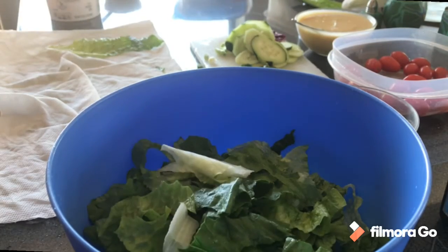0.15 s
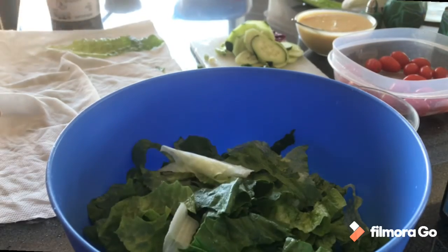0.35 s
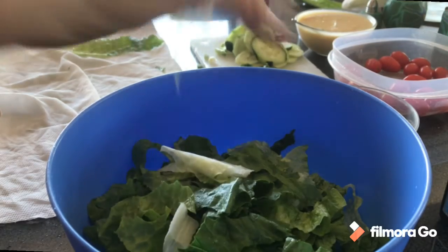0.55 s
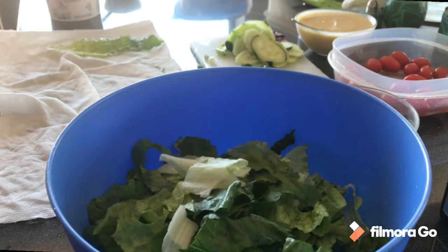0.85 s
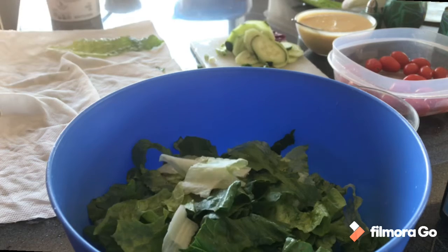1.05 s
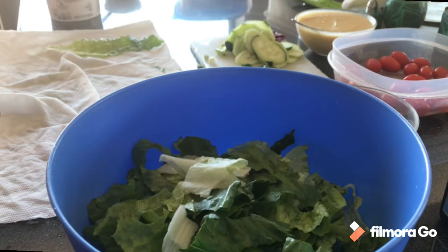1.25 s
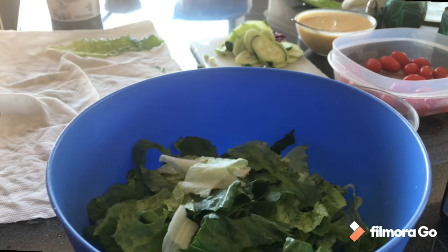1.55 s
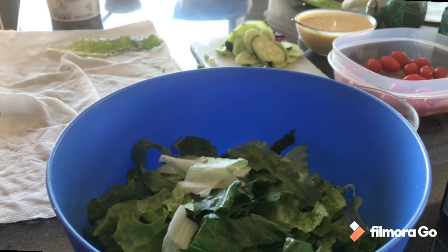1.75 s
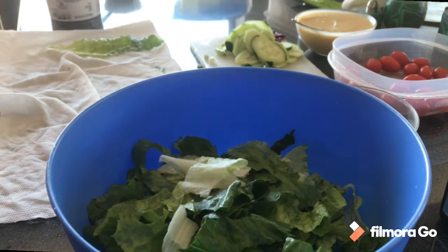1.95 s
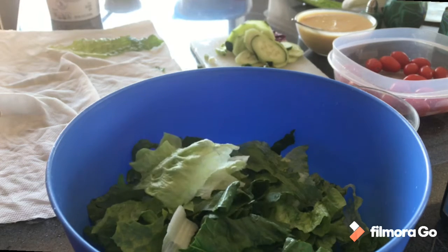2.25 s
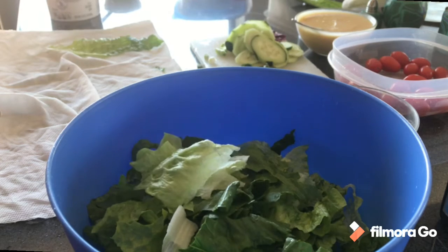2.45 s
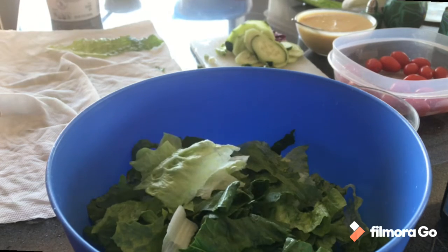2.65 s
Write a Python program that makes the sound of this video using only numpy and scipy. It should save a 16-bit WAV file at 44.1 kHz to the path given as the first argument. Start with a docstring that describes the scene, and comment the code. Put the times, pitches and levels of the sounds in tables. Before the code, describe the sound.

Crisp lettuce is torn by hand close to a small microphone, snapping and crackling in three short bursts. After each of the first two, a piece drops lightly into a plastic bowl. A kitchen appliance hums faintly behind.

```python
"""Crisp lettuce snaps and crackles as hands tear it over a plastic bowl, close to a small microphone.
Ribs break in short clusters of tiny cracks; between them the leaf crackles and slides on itself.
Two torn pieces drop into the bowl, each landing in several light touches.
The kitchen answers with a short tail over steady air noise and a low appliance hum."""
import sys
import numpy as np
from scipy import signal
from scipy.io import wavfile

SR = 44100
rng = np.random.default_rng(int(sys.argv[2]) if len(sys.argv) > 2 else 0)


def master_out(mix):
    """Clip the mix to full scale and print it as 16-bit PCM to the path in sys.argv[1]."""
    frames = np.transpose(np.atleast_2d(mix))
    ceiling = np.clip(frames, -1, 1)
    pcm = np.round(ceiling * 32767).astype(np.int16)
    wavfile.write(sys.argv[1], SR, pcm)


N = 123480


def amp(db):
    return 10 ** (np.asarray(db) / 20)


def unit_rms(x):
    return x / np.sqrt(np.mean(x ** 2) + 1e-20)


def unit_energy(x):
    return x / np.linalg.norm(x)


def curve_at(curve, hz):
    """Interpolate a curve over log frequency."""
    knots_hz, values = np.transpose(curve)
    return np.interp(np.log(hz + 1), np.log(knots_hz + 1), values)


def coloured(x, spectrum):
    """Minimum-phase filter from (freq_hz, gain_db) points."""
    hz = abs(np.fft.fftfreq(8192, 1 / SR))
    log_gain = np.log(amp(curve_at(spectrum, hz)))
    response = np.exp(np.conj(signal.hilbert(log_gain)))
    taps = np.fft.ifft(response).real[:4096]
    return signal.oaconvolve(x, taps)[:len(x)]


def unit_band(x, lo_hz, hi_hz, order=2):
    """Band-pass, scaled to unit energy."""
    sos = signal.butter(order, [lo_hz, hi_hz], "bandpass", fs=SR, output="sos")
    return unit_energy(signal.sosfilt(sos, x))


# Air noise spectrum: freq_hz, gain_db
AIR_SPECTRUM = [(20, -21), (35, -17), (55, -3), (110, -8.5), (250, -6), (450, -15.5), (750, -22.5),
                (1050, -22), (1700, -28.5), (3000, -32.5), (6000, -36), (10500, -39), (16000, -33)]


def air_noise(level_db=-59):
    """Room air: steady noise, strongest in the bass."""
    return amp(level_db) * unit_rms(coloured(rng.standard_normal(N), AIR_SPECTRUM))


# Hum lines: pitch_hz, width_hz, level_db
HUM_LINES = [(69.6, 9, -64), (129.5, 8.7, -63), (196.6, 4.5, -75), (233.7, 16, -68), (269.4, 2, -68.5),
             (295, 4.7, -82), (473, 6.9, -73.5)]


def appliance_hum(waver_share=0.53):
    """Fuzzy appliance tones: each line wavers, and the narrow ones also have a steady core."""
    out, t = np.zeros(N), np.arange(N) / SR
    for pitch_hz, width_hz, level_db in HUM_LINES:
        pole = np.exp(-np.pi * width_hz / SR)
        noise = rng.standard_normal(N) + 1j * rng.standard_normal(N)
        waver = signal.lfilter([1], [1, -pole], noise)
        core = (1 - waver_share) * (width_hz < 10)
        envelope = core + waver_share * waver / waver.std()
        tone = (envelope * np.exp(2j * np.pi * pitch_hz * t)).real
        out += amp(level_db) * unit_rms(tone)
    return out


# Kitchen decay: freq_hz, t60_s
KITCHEN_DECAY = [(500, .4), (1300, 0.47), (3500, 0.47), (9000, 0.22), (16000, 0.17)]


def kitchen_reverb(x, gain_db=-11, gap_s=0.0018, early_db=2.5, early_t60_s=0.046):
    """Near surfaces answer first, then a dense tail dies at its own rate in each band."""
    hz, t, noise = signal.stft(rng.standard_normal((3, SR)), SR, nperseg=256)
    early = amp(early_db - 60 * t / early_t60_s)
    late = amp(-60 * t / curve_at(KITCHEN_DECAY, hz)[:, None])
    tails = signal.istft(noise * (early + late), SR, nperseg=256)[1]
    tails *= np.clip(np.arange(tails.shape[1]) / SR / gap_s - 1, 0, 1)
    # Three tails crossfade quickly and steadily, keeping the decay smooth and free of ringing.
    phases = np.pi * (40 * np.arange(N) / SR + np.arange(3)[:, None] / 3)
    fades = np.sqrt(2 / 3) * np.cos(phases)
    wet = sum(signal.fftconvolve(x * fade, unit_energy(tail))[:N] for fade, tail in zip(fades, tails))
    return amp(gain_db) * wet


# Leaf handling envelope: time_s, level_db
HANDLING_LEVELS = [(0.0, -68), (0.14, -62.5), (0.27, -48), (0.33, -60), (0.38, -42.5), (0.66, -68),
                   (0.74, -97), (0.93, -64), (1.08, -80), (1.32, -66.5), (1.56, -61.5), (1.65, -45),
                   (1.8, -49), (1.9, -62.5), (2.22, -103), (2.45, -55.5), (2.57, -53.5), (2.71, -59),
                   (2.8, -65.5)]
# Leaf crackle spectrum: freq_hz, gain_db
LEAF_SPECTRUM = [(300, -52), (700, -10), (950, -8.5), (1200, 1.5), (1600, -10.5), (2700, -1), (4500, -4.5),
                 (6500, -7.5), (10500, -10), (13000, -12), (16000, -15)]


def leaf_crackle(cracks_per_s=1100, spread_db=3, grain_t60_s=0.02, rustle_db=-11.5):
    """Small random cracks of varied colour and a fine rustle follow the handling."""
    sizes = amp(spread_db * np.minimum(rng.exponential(1, N), 3))
    impulses = sizes * (rng.random(N) < cracks_per_s / SR)
    grain_index = rng.integers(0, 24, N)
    decay = amp(-60 * np.arange(600) / SR / grain_t60_s)
    cracks = np.zeros(N)
    for k, grain in enumerate(rng.standard_normal((24, 600))):
        cracks += signal.oaconvolve(impulses * (grain_index == k), unit_energy(grain * decay))[:N]
    leaf = unit_rms(cracks) + amp(rustle_db) * rng.standard_normal(N)
    time_s, level_db = np.transpose(HANDLING_LEVELS)
    envelope = amp(np.interp(np.arange(N) / SR, time_s, level_db))
    return envelope * unit_rms(coloured(leaf, LEAF_SPECTRUM))


def crack_clusters(events, thud_db, lead_db=-np.inf):
    """Swelling, dying clusters of tiny cracks ring leaf, rib and bowl; thud_db is relative to the body."""
    cracks_per_s, spread_db = 13000, 2
    bounce_s, bounce_db = 0.0013, -15  # reflection off the counter
    ring_share, ring_half_width_hz = 0.41, 190
    body_floor_hz, body_half_width_hz = 957, 220
    span = 4096
    out, t = np.zeros(N + span), np.arange(1, span + 1) / SR
    for event in events:
        start_s, level_db, ring_hz, body_hz, body_db, treble_db, rise_s, length_s = event
        chance, size_draw, sign_draw = rng.random((3, span))
        sizes = amp(-spread_db * np.log(size_draw + 0.0052))
        cracks = (chance < cracks_per_s / SR) * np.sign(sign_draw - 0.5) * sizes
        cracks *= (1 - np.exp(-(t / rise_s) ** 2)) * amp(-20 * t / length_s)
        cracks[round(rise_s * SR / 2)] += amp(lead_db) * np.linalg.norm(cracks)  # lead crack
        cracks += amp(bounce_db) * np.roll(cracks, round(bounce_s * SR))

        ring = unit_band(cracks, ring_hz - ring_half_width_hz, ring_hz + ring_half_width_hz, order=1)
        crisp = unit_energy(ring_share * ring + (1 - ring_share) * unit_band(cracks, 2350, 7980))
        body_lo_hz = max(body_hz - body_half_width_hz, body_floor_hz)
        body = amp(body_db) * unit_band(cracks, body_lo_hz, body_hz + body_half_width_hz)
        treble = amp(treble_db) * unit_band(cracks, 5330, 14360)
        thud = amp(body_db + thud_db) * unit_band(cracks, 193, 703)
        at = round(start_s * SR)
        out[at:at + span] += amp(level_db) * np.sqrt(length_s * SR) * (crisp + body + treble + thud)
    return out[:N]


# Slides and small snaps: start_s, level_db, ring_hz, body_hz, body_db, treble_db, rise_s, length_s
SLIDES_AND_SMALL_SNAPS = [(0.038, -58.5, 4320, 1190, -7.5, -12, 0.013, 0.04),
                          (0.905, -59.5, 4000, 1100, -7, -15, 0.0075, 0.038),
                          (0.929, -59, 5500, 1090, -9, -8, 0.0074, 0.044),
                          (0.964, -63, 5100, 1100, -13, -4, .006, 0.051),
                          (1.014, -54.5, 4540, 1100, -15, -14, 0.0017, 0.005),
                          (1.261, -61.5, 5860, 1180, -9, 2.5, 0.0097, 0.025),
                          (1.385, -52, 4900, 2000, -7, -1, .001, 0.02),
                          (0.599, -64, 3970, 1400, -19, -2, .008, 0.032),
                          (1.409, -62, 4030, 1500, -7, -2, .01, 0.14),
                          (1.914, -62, 5030, 1090, -9, -2, 0.0062, 0.027),
                          (1.988, -70, 5100, 1100, -10, 2, .008, 0.076),
                          (2.037, -69, 4500, 1100, -10, 4, 0.0093, 0.037),
                          (2.074, -78, 5000, 1100, -8, 4, .008, 0.059),
                          (2.642, -49.5, 4300, 1200, -9, 0, 0.0086, 0.029)]


def slides_and_small_snaps():
    """Soft slides of leaf on leaf and two small, quick snaps."""
    return crack_clusters(SLIDES_AND_SMALL_SNAPS, thud_db=-13.5)


# Touches on the bowl: start_s, level_db, ring_hz, body_hz, body_db, treble_db, rise_s, length_s
BOWL_TOUCHES = [(.7025, -48, 4460, 2180, -19, -8, .001, 0.0089),
                (.7055, -35, 5450, 2380, -14.5, -5, 0.0014, 0.0042),
                (.7145, -52, 5700, 2100, -11, -6, 0.0018, 0.0065),
                (.719, -53, 3500, 1000, -5, -6, .002, 0.0054),
                (.738, -59, 3960, 1100, -6, -9, 0.0023, 0.0069),
                (2.129, -51, 5400, 1660, -7, -7, 0.0022, 0.0063),
                (2.1385, -48, 4100, 1090, -6, -4, 0.0017, 0.0094),
                (2.152, -49.5, 3590, 1930, -10, -8, 0.0016, .007),
                (2.160, -57, 3670, 975, -12, 0, 0.0023, 0.0077),
                (2.172, -65, 5650, 965, -13, -4, .002, .005)]


def bowl_drops():
    """Two pieces land in the plastic bowl, each touch with a low thud."""
    return crack_clusters(BOWL_TOUCHES, thud_db=-1)


# Rib breaks: start_s, level_db, ring_hz, body_hz, body_db, treble_db, rise_s, length_s
RIB_SNAPS = [(0.0406, -52.7, 3690, 2070, -11, -3, 0.00057, 0.0028),
             (0.0519, -51.6, 2880, 1420, -16, -3, 0.0006, 0.0033),
             (0.0768, -60, 5800, 2060, -1, 0, 0.00051, 0.0045),
             (0.1107, -43, 4600, 2130, -31, -12.7, 0.00054, 0.013),
             (0.1183, -44.5, 4370, 950, -13.5, -9.7, 0.001, 0.0065),
             (0.139, -50, 2860, 1920, -15, -5, 0.0006, 0.0052),
             (0.151, -63, 6040, 1270, -5, -3, 0.0006, 0.0045),
             (0.1769, -36.5, 5550, 1210, -15, -9, 0.00026, 0.0045),
             (0.2036, -36, 5450, 1210, -4.5, -9.5, 0.00067, 0.0064),
             (0.2229, -48, 4730, 1210, 0, -10, 0.00098, 0.013),
             (0.227, -34, 7350, 1960, -16, -10, 0.00032, 0.0054),
             (0.2336, -39, 2600, 1760, -5.5, -10, 0.0006, 0.005),
             (0.2427, -34.5, 6040, 1480, -11.1, -12, 0.00083, 0.0075),
             (0.2596, -50, 6930, 1900, 1, -14, 0.00048, 0.0042),
             (0.3, -31, 4630, 2030, -21, 0.5, 0.00036, 0.0067),
             (0.3095, -52, 4680, 2100, -3, 4, 0.00051, 0.0045),
             (0.3158, -54, 3830, 2150, 0, 3, 0.00073, 0.0038),
             (0.3281, -48, 5300, 1440, -9, 2, 0.00054, 0.0045),
             (0.3545, -44.5, 6220, 1340, -18, -11, 0.0005, 0.0021),
             (0.361, -39.7, 4380, 1960, -4.5, -16, 0.00069, 0.013),
             (0.3668, -20.5, 2980, 1410, -7, -12, 0.00026, 0.0057),
             (0.3769, -30.5, 4420, 1850, -23, -4, 0.00072, 0.0092),
             (0.3953, -28.5, 4600, 2210, -12.5, -23, 0.00086, 0.0069),
             (0.3992, -36, 4400, 2170, -20, 1, 0.0006, 0.0051),
             (0.4162, -34, 4450, 1890, -21, -6, 0.00028, 0.0019),
             (0.445, -29.5, 2700, 2100, -29, -4.3, 0.00036, 0.0041),
             (0.4585, -43, 3130, 2160, -3.5, -10, 0.00079, 0.0076),
             (0.5808, -54, 5440, 2200, -11, -5.8, 0.0006, 0.0045),
             (0.5926, -52.1, 3570, 1370, -6, -1.5, 0.00066, 0.0053),
             (0.8324, -60.5, 4790, 1040, -8.8, -5, 0.00074, 0.0048),
             (0.846, -62.1, 6400, 1410, -15, -9.5, 0.0005, 0.0056),
             (0.9105, -61, 2660, 1200, -14, -11.8, 0.00069, 0.0045),
             (0.9243, -52.5, 6850, 1350, -8, -13, 0.00071, 0.0049),
             (0.9383, -63, 6940, 1510, -15, -13, 0.00067, 0.0045),
             (0.9851, -49.5, 5600, 1200, -9, 0, 0.0006, 0.0036),
             (1.0227, -60, 5700, 1250, -17.3, 4.5, 0.00043, 0.013),
             (1.0528, -57, 4670, 2060, -6.5, -10.1, 0.0006, 0.0041),
             (1.12, -61.0, 4600, 1110, -2, -7, 0.001, 0.0054),
             (1.2476, -78, 3380, 2010, -5.7, 14, 0.0006, 0.0033),
             (1.2695, -57.5, 5750, 1840, -16.4, -6, 0.00086, 0.0045),
             (1.337, -60.5, 6090, 1150, -18, -8, 0.0006, 0.0037),
             (1.3717, -46, 6200, 1270, -16, -5.9, 0.00075, 0.0045),
             (1.3988, -34, 2800, 2110, -14, -1.7, 0.0004, 0.0036),
             (1.4752, -43, 4070, 1750, -14.9, -17, 0.00063, 0.005),
             (1.5112, -50.5, 2750, 1420, -8.5, -17, 0.00052, 0.0038),
             (1.5741, -51.8, 5870, 2160, -0.5, 4, 0.00056, 0.0042),
             (1.5967, -51, 4290, 1350, 0, -7, 0.00043, 0.0032),
             (1.6112, -30, 4260, 2190, -6.9, -5.4, 0.0003, 0.0043),
             (1.6247, -50, 2820, 2220, -16, -1, 0.0006, 0.0045),
             (1.6364, -36, 4540, 1240, -5.5, -18, 0.00055, 0.0063),
             (1.6429, -35.9, 5450, 1150, -20, -2, 0.00065, 0.0056),
             (1.6617, -22, 4570, 1020, -13.5, -9, 0.00045, 0.0089),
             (1.683, -29, 4110, 1210, -21, -6, 0.00049, 0.006),
             (1.6994, -37.5, 6100, 1850, -2, -4, 0.00063, 0.0047),
             (1.7047, -36, 5400, 1830, -4, -6, 0.00052, 0.0045),
             (1.7111, -29, 4500, 1280, -8.0, -4, 0.0006, 0.0094),
             (1.7209, -31.5, 4140, 1160, -13, -9.1, 0.0007, 0.0061),
             (1.7298, -30.5, 5770, 1550, -8.5, -9, 0.00056, 0.0045),
             (1.7386, -37, 5300, 1230, -29, -8.7, 0.00095, 0.0075),
             (1.7578, -44, 5340, 1700, -6.5, -2, 0.00066, 0.0078),
             (1.7901, -46.5, 4660, 2190, -8.3, 5, 0.00042, 0.0045),
             (1.8039, -42.5, 6550, 1380, -7, 5.5, 0.0006, 0.003),
             (1.8159, -41, 5900, 1410, -6.5, -8.4, 0.00062, 0.006),
             (1.9452, -53, 5030, 940, -11, -5, 0.00084, 0.006),
             (2.0253, -60.8, 4220, 1090, -5.5, 0, 0.00042, 0.0056),
             (2.1947, -59.2, 3600, 1010, -2, -10, 0.0011, 0.0091),
             (2.2002, -48.5, 2450, 2270, -4, -3, 0.00041, 0.0023),
             (2.254, -59.5, 3900, 960, -6, -7, 0.00045, 0.0045),
             (2.3128, -64.2, 3880, 2190, -8.2, -7, 0.0007, 0.0051),
             (2.367, -56, 3840, 1030, -11, -14.1, 0.00075, 0.006),
             (2.3877, -78, 2910, 1640, -11, -17, 0.0006, 0.0036),
             (2.4083, -48.5, 3840, 1220, -10, -1, 0.0006, 0.0041),
             (2.4227, -47.5, 4570, 2200, -29, 0, 0.00062, 0.0051),
             (2.4427, -46.6, 2730, 1300, -13, -17, 0.001, 0.0081),
             (2.4526, -38.5, 5900, 1950, -25, -7, 0.00094, 0.0048),
             (2.4574, -45.5, 5700, 2130, -35, -7, 0.00083, 0.0045),
             (2.471, -42.5, 3300, 1160, -9.5, -17, 0.00053, 0.0058),
             (2.5132, -29.5, 6060, 2000, -11, -7.5, 0.00026, 0.0028),
             (2.5227, -45, 4100, 2100, -13, -14, 0.00063, 0.0039),
             (2.5671, -36.5, 5660, 2100, -30, -2, 0.00065, 0.0041),
             (2.5943, -50.8, 4440, 1570, -12, -5, 0.00053, 0.0045),
             (2.6074, -48, 6300, 2200, -24, 0.5, 0.00067, 0.0043),
             (2.621, -46, 2900, 1200, -6, -8, 0.00073, 0.0045),
             (2.6379, -45, 2750, 2140, -17, -6.4, 0.0006, 0.0053),
             (2.6519, -45, 4150, 1230, -16, -2.6, 0.00056, 0.0034),
             (2.684, -51.5, 2730, 960, -9, -4, 0.00046, 0.0048),
             (2.7373, -52.7, 4070, 1190, -5, 0.5, 0.00069, 0.0056)]


def rib_snaps():
    """Each rib break opens with one clean crack, then a short cluster."""
    return crack_clusters(RIB_SNAPS, thud_db=-13.5, lead_db=-5)


def scene():
    """Tearing and drops with their kitchen reverb, over air and hum; mono."""
    bowl_shade_db = -2.5  # the bowl hides the drops from the room
    tearing = rib_snaps() + slides_and_small_snaps() + leaf_crackle()
    drops = bowl_drops()
    reverb = kitchen_reverb(tearing + amp(bowl_shade_db) * drops)
    return (air_noise() + appliance_hum() + reverb + drops + tearing)[None]


# Microphone response: freq_hz, gain_db
MIC_RESPONSE = [(20, -9), (50, -2), (8000, 1), (10500, -3), (13000, -1), (15650, -1.5), (16000, -23),
                (17000, -21)]


def record(dry):
    """Small-microphone colour, then a steep low-pass."""
    cutoff_hz = 16700
    heard = coloured(dry[0], MIC_RESPONSE)
    lowpass = signal.firwin(255, cutoff_hz, window=("kaiser", 9), fs=SR)
    return signal.oaconvolve(heard, lowpass, "same")[None]


dry = scene()
out = record(dry)
master_out(out)
```